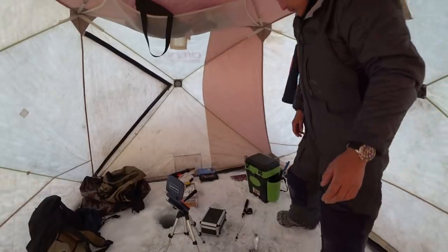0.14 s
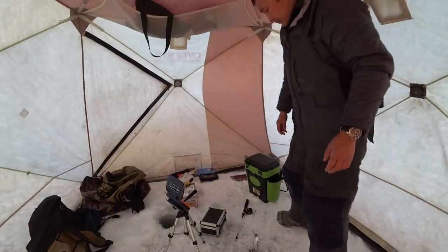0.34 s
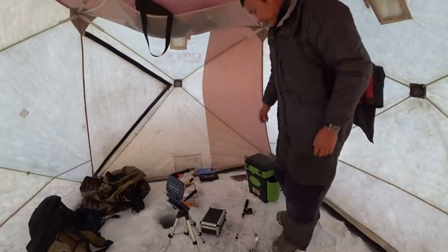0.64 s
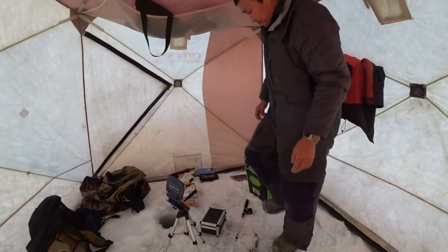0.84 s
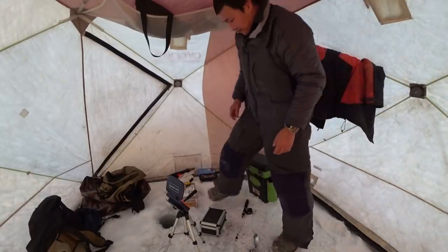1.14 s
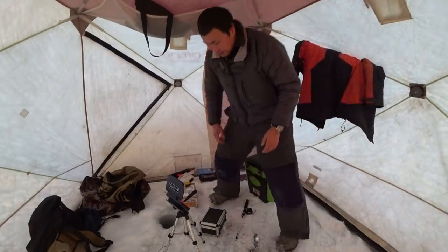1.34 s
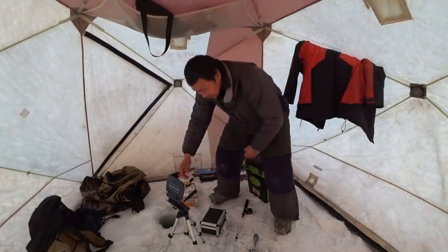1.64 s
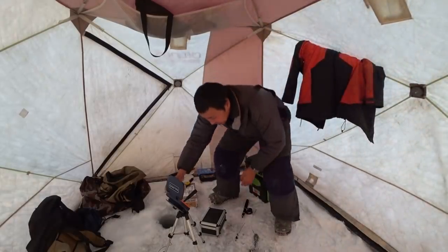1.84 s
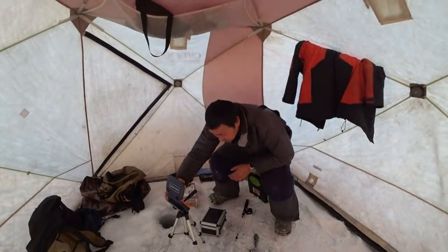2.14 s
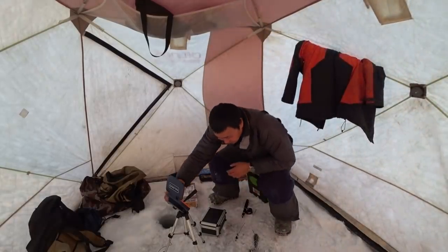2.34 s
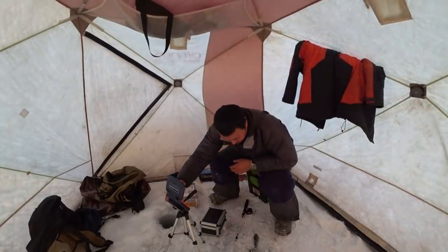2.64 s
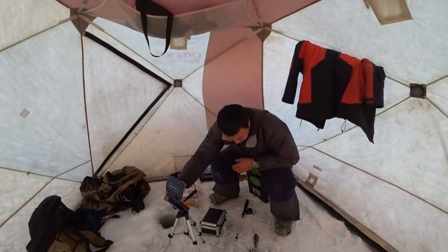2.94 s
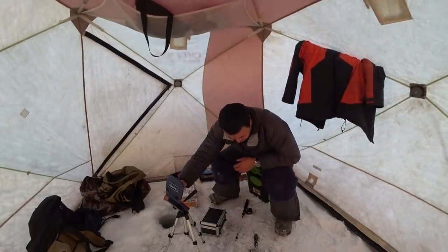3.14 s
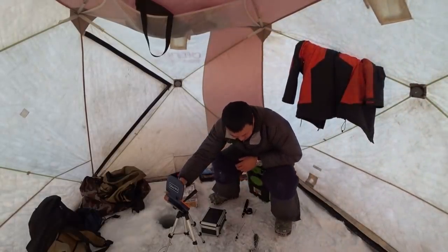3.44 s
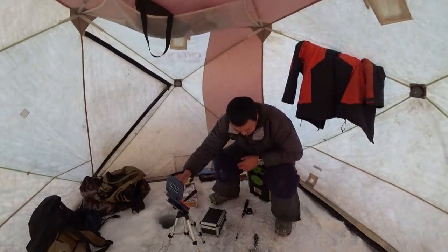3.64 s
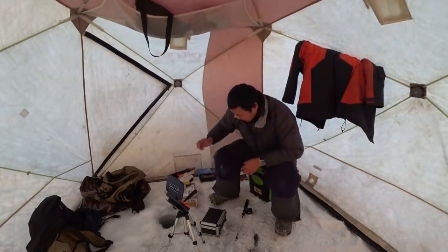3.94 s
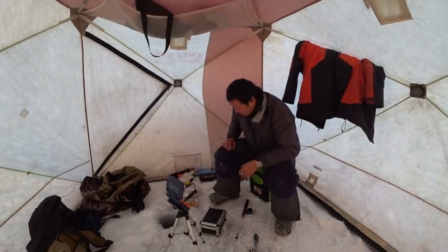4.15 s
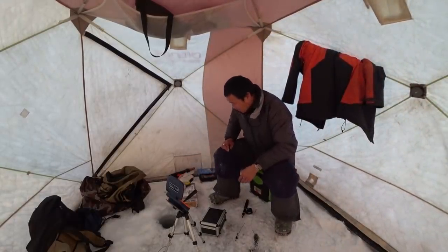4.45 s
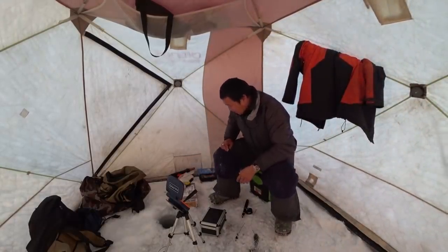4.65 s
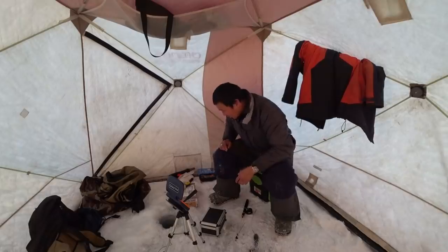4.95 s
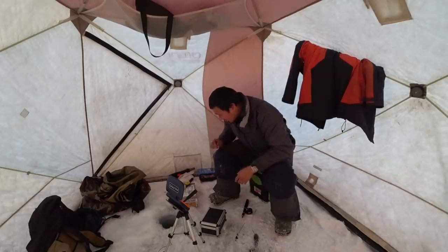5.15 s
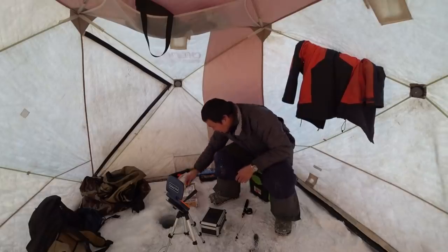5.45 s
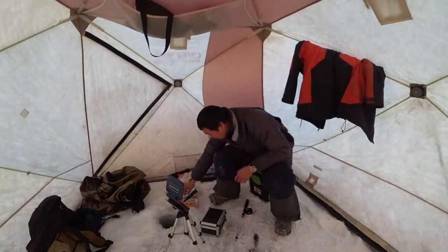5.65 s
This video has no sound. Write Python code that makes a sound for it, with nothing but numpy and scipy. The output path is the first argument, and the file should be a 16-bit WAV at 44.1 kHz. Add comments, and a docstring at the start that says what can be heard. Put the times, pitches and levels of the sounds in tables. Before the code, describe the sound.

For the first two seconds, a man takes a few soft steps over snowy ice inside a tent. Grains crunch, packed snow creaks and his padded jacket swishes lightly, with the firmest step and a crusty snap at about 1.3 seconds. From around 2.4 seconds, small fishing gear scrapes over the ice in short, gritty slips with a hollow ring, mixed with small creaks and bright snaps. The jacket rustles more strongly from 3.6 to 4.2 seconds, and a sleeve gives a brief hoarse whine as it slides over his knee, with a sharp crack near 4.2 seconds. From 4.4 seconds, a quick run of rasping scrapes builds to the loudest moment at about 5 seconds. Only a few light clicks and a faint rustle follow. Everything sounds fairly close and central, with a very short echo from the cloth walls over a faint, steady hiss.

```python
"""Small gear scrapes over ice in short, rasping slips with a hollow ring, handled by a man in a fishing tent.
He first steps across the snowy ice and sits: grains crunch under his boots, packed snow creaks, crust snaps.
His padded jacket swishes as threads catch and let go; a sleeve whines over his knee.
The tent walls give a very short echo over quiet air."""
import sys
import numpy as np
from scipy import signal
from scipy.fft import rfft, irfft
from scipy.io import wavfile
from scipy.ndimage import uniform_filter1d

SR = 44100
rng = np.random.default_rng(int(sys.argv[2]) if len(sys.argv) > 2 else 0)


def int16_out(signal):
    """Quantize to a 16-bit WAV file."""
    q = np.round(np.clip(np.atleast_2d(signal).T, -1, 1) * 32767)
    wavfile.write(sys.argv[1], SR, q.astype(np.int16))


N = 256220
TIME = np.arange(N) / SR

# spectra of crushed snow, rasping gear and glassy bare ice: freq_hz, relative_db
SNOW_SPECTRUM = [(60, -53), (170, -33), (250, -6.5), (340, -3.5), (430, -9), (600, 1), (900, 1), (1300, 0),
                 (2200, -7.5), (3300, -13.5), (7000, -14), (11000, -19.5)]
RASP_SPECTRUM = [(30, -83), (150, -19), (280, -14), (450, -7), (700, -3), (1150, -2), (1700, 1.5),
                 (2700, 0), (3500, -2), (5000, -3), (6800, -0.5), (9000, -5), (11000, -4.5)]
ICE_SPECTRUM = [(100, -28), (600, -9), (1300, 2), (1900, 2), (2700, 3), (3400, -8.5), (4100, 1),
                (4900, -12), (11000, -17)]


def gear_slips(rise_s=0.0011, hold_s=0.0048, fade_s=0.0087, grit_s=0.017, lag_s=0.00298, build_s=0.0048):
    """Each slip rasps abruptly and crushes grit; the hollow ring builds up and outlasts it."""
    # start_s, level_db
    slips = [(2.499, -27), (2.523, -26.5), (2.779, -20), (2.879, -22.5), (2.93, -21), (2.965, -20.5),
             (2.997, -19.5), (3.079, -27.5), (3.174, -26.5), (3.366, -21.5), (3.442, -23.5), (3.629, -24),
             (3.673, -19.5), (3.696, -20.5), (4.428, -24), (4.464, -17.5), (4.606, -17), (4.675, -16),
             (4.697, -28), (4.727, -18), (4.748, -22), (4.789, -35), (4.856, -15.5), (4.896, -13.5),
             (4.924, -11.5), (4.954, -9.5), (5.006, -9.5), (5.489, -32)]
    rasp_db, grit_db, ring_db = -8.5, -16, -2.5
    rasp, grit, ring = np.zeros((3, N))
    t = np.arange(6000) / SR
    slide = (1 - np.exp(-t / rise_s)) * np.exp(-np.maximum(t - hold_s, 0) / fade_s)
    build = 1 - np.exp(-(t / build_s) ** 2)
    for start_s, level_db in slips:
        body_db = 1.174 * level_db  # hard slips ring more
        add(rasp, start_s, amp(level_db + rasp_db) * slide * rng.standard_normal(len(t)))
        add(grit, start_s, amp(body_db + grit_db) * np.exp(-t / grit_s) * rng.standard_normal(len(t)))
        add(ring, start_s + lag_s, amp(body_db + ring_db) * build * gear_ring(detune=0.004))
    return colour(rasp, RASP_SPECTRUM) + colour(grit, SNOW_SPECTRUM) + ring


def gear_drags(ice_db=-5, rise_s=0.058, t60_s=0.066):
    """Grit chatters against the gear and keeps it ringing; bare ice adds a glassy scrape."""
    # start_s, length_s, level_db
    drags = [(2.382, 0.1, -36.5), (2.623, 0.39, -41), (3.012, 0.5, -50), (3.448, 0.088, -36.5),
             (3.617, 0.26, -34.5), (3.835, 0.36, -43), (4.181, .05, -31), (4.41, 0.15, -33.5)]
    grit = grains(rate_hz=4000, spread_db=2.5, clump_db=1.2, clump_hz=110)
    ring = unit(signal.oaconvolve(grit, gear_ring())[:N])
    crunch = unit(colour(grit, SNOW_SPECTRUM))
    scrape = amp(ice_db) * unit(colour(rng.standard_normal(N), ICE_SPECTRUM))
    push = power_sum(stroke(*drag, rise_s, change_db=0, t60_s=t60_s) for drag in drags)
    return push * unit(ring + crunch + scrape)


def gear_ring(detune=0):
    """Hollow ring after one push; so small a body radiates no bass."""
    # freq_hz, level_db, t60_s
    modes = [(351.3, -21, 0.11), (880, -7, 0.073), (941, 8.5, 0.041), (1436, 7, 0.036), (1676, -8, 0.056),
             (2060, -12, 0.054), (2310, -5.5, 0.042), (2470, -12, 0.092), (2684, 2.5, 0.028),
             (2863, -15, 0.04)]
    t = np.arange(6000) / SR
    ring = np.zeros(len(t))
    for freq_hz, level_db, t60_s in modes:
        detuned_hz = freq_hz * (1 + detune * rng.normal())
        ring += amp(level_db - 60 * t / t60_s) * np.cos(2 * np.pi * detuned_hz * t)
    return bandpass(ring, 170, 5000)


def snow_creaks(gain_db=-8, t60_s=0.0056, grit_db=-12, tail_db=-14, tail_t60_s=0.047):
    """Packed snow gives way in a few dull, gritty cycles; near walls return them and grains settle."""
    # start_s, level_db, pitch_hz, slip_s
    creaks = [(.184, -34.5, 736, 0.00059), (.513, -36, 860, 0.0018), (.586, -35.5, 990, 0.0046),
              (.746, -29, 1210, .003), (.977, -33.5, 955, 0.0039), (1.034, -37, 830, 0.0029),
              (1.093, -27, 885, 0.0019), (1.171, -38, 880, 0.0027), (1.277, -17, 1313, 0.0039),
              (1.296, -23, 984, 0.0064), (1.888, -32, 918, 0.0061), (1.909, -32, 807, 0.0081),
              (1.971, -30.5, 730, 0.00034), (2.126, -29, 815, 0.0044), (2.164, -25.5, 1020, 0.00072),
              (2.591, -41.5, 1030, 0.0065), (3.044, -32, 775, 0.0012), (3.114, -39, 795, .0015),
              (3.149, -25.5, 910, 0.00083), (3.202, -33, 780, 0.0013), (3.233, -25.5, 1260, 0.0039),
              (3.252, -30.5, 880, 0.0017), (3.3, -32, 786, .0014), (3.339, -24, 900, 0.0011),
              (3.404, -26.5, 870, 0.0021), (5.592, -25.5, 700, 0.00074)]
    # freq_hz, relative_db
    creak_spectrum = [(60, -29), (180, -33), (240, -2.5), (330, 5), (440, -4.5), (640, -5), (1300, -6.5),
                      (1900, -3), (3500, -9), (11000, -16)]
    echo_s, echo_gain = 0.004534, 0.74
    out, t = np.zeros(N), np.arange(3000) / SR
    for start_s, level_db, pitch_hz, slip_s in creaks + faint_creaks():
        unsteady, grit, settle = rng.standard_normal((3, len(t)))
        rate_hz = pitch_hz * (1 + 0.2 * unit(uniform_filter1d(unsteady, size=30)))
        pop = np.cos(2 * np.pi * np.cumsum(rate_hz) / SR) + amp(grit_db) * grit
        pop *= amp(level_db - 60 * np.maximum(t - slip_s, 0) / t60_s)
        tail = amp(level_db + tail_db - 60 * t / tail_t60_s) * settle
        add(out, start_s, pop + tail)
        for bounce in (1, 2):
            delay_s = echo_s * (bounce + rng.uniform(-0.307, 0.355))
            add(out, start_s + delay_s, echo_gain ** bounce * pop)
    return amp(gain_db) * colour(out, creak_spectrum)


def faint_creaks(gap_s=0.03, pitch_hz=824, slip_s=0.00092, spread_db=0.2):
    """Rows of small creaks that follow each other unevenly while the weight shifts."""
    # start_s, end_s, level_db
    weight_shifts = [(0.884, 1.24, -39), (1.512, 1.6, -32.5), (1.937, 2.27, -37)]
    rows = []
    for start_s, end_s, level_db in weight_shifts:
        at_s = start_s
        for longer, softer, higher in rng.standard_normal((16, 3)):
            if at_s < end_s:
                rows.append((at_s, level_db - spread_db * softer, pitch_hz * np.exp(0.27 * higher), slip_s))
            at_s += gap_s * np.exp(0.3 * longer)
    return rows


def boots(skid_db=-1):
    """Grains break under the sole, more weakly as the snow packs; on bare ice the sole skids."""
    # start_s, length_s, level_db, rise_s
    steps = [(0.223, .12, -36, 0.095), (0.629, 0.15, -39, 0.029), (1.267, 0.11, -27.5, 0.0025),
             (1.612, 0.021, -29, 0.017), (1.694, 0.058, -35.5, 0.047)]
    # start_s, length_s, level_db
    skids = [(0.634, 0.011, -33.5), (0.665, 0.094, -40.5), (0.792, 0.1, -43)]
    crunch = grains(rate_hz=3500, spread_db=3, clump_db=1.4, clump_hz=120)
    weight = power_sum(stroke(*step, change_db=-4.5, t60_s=0.21) for step in steps)
    slide = power_sum(stroke(*skid, rise_s=0.005, change_db=-3.5, t60_s=0.064) for skid in skids)
    snow = weight * patchy(colour(crunch, SNOW_SPECTRUM), depth_db=1.5)
    ice = amp(skid_db) * slide * unit(colour(crunch, ICE_SPECTRUM))
    return snow + ice


def jacket(gain_db=2):
    """Threads catch and let go thousands of times a second."""
    # faint rustle as the body shifts: time_s, level_db
    stir = [(.16, -76), (.21, -55), (1.15, -53.5), (2.0, -50), (3.2, -50), (4.35, -52), (5.08, -64),
            (5.3, -59), (5.81, -55)]
    # arms and legs: start_s, length_s, level_db, rise_s, change_db
    swishes = [(0.174, 0.1, -46, 0.067, -6.5), (0.608, .26, -46, .03, -9), (1.188, 0.24, -43.5, 0.094, -9),
               (1.475, 0.18, -44, 0.045, 3.5), (1.611, 0.3, -39, 0.012, -7.5), (2.372, 0.072, -34, 0.08, 2),
               (2.62, .38, -44.5, 0.057, 5.5), (3.356, 0.22, -43, 0.024, 5.5),
               (3.589, 0.12, -27, 0.041, -5.5), (3.768, 0.45, -30.5, 0.063, -0.5),
               (4.373, 0.15, -34.5, 0.024, -1), (5.106, .13, -52.5, 0.057, 0.5),
               (5.48, 0.29, -60.5, 0.042, 9)]
    # freq_hz, relative_db
    cloth_spectrum = [(60, -35.5), (170, -26), (290, -1), (430, -9.5), (700, 2.5), (1600, 4), (3300, -0.5),
                      (5000, -1), (7500, 2.5), (9200, -0.5), (11000, -2)]
    rub = grains(rate_hz=6000, spread_db=2, clump_db=1.5, clump_hz=46)
    motion = power_sum([level_curve(stir)] + [stroke(*swish, t60_s=0.18) for swish in swishes])
    return amp(gain_db) * motion * patchy(colour(rub, cloth_spectrum), depth_db=2)


def sleeve(gain_db=-1, jitter=0.0499, jitter_hz=448, flutter_hz=160, hiss_db=-7):
    """Ribs of the weave tick over the knee at an unsteady rate: a hoarse whine in a dull hiss."""
    # time_s, level_db, pitch_hz
    slide = [(4.098, -40.5, 964), (4.199, -32, 931), (4.261, -35.5, 911), (4.331, -37, 880),
             (4.4, -37, 874), (4.441, -48, 880)]
    # harmonics from the fundamental up: level_db
    harmonics = [0.5, 2.5, -5.5, -13]
    time_s, _, pitch_hz = np.transpose(slide)
    rate_hz = np.interp(TIME, time_s, pitch_hz) * (1 + jitter * wander(jitter_hz))
    phase = 2 * np.pi * np.cumsum(rate_hz) / SR
    whine = sum(amp(db) * wander(flutter_hz) * np.cos(k * phase) for k, db in enumerate(harmonics, 1))
    hiss = bandpass(rng.standard_normal(N), 550, 2800)
    return amp(gain_db) * level_curve(slide) * unit(unit(whine) + amp(hiss_db) * unit(hiss))


def snaps(gain_db=-5, t60_s=0.053):
    """Ice crust and small parts snap in brief, bright cracks."""
    # start_s, level_db
    cracks = [(.636, -32), (.8137, -35.5), (1.27, -19.5), (2.164, -31.5), (2.2827, -28), (2.416, -20.5),
              (2.5424, -25.5), (2.778, -18.5), (3.492, -19.5), (3.653, -19), (3.751, -20), (4.205, -15.5),
              (4.384, -19.5), (4.403, -27), (5.222, -24.5), (5.5912, -29)]
    out, t = np.zeros(N), np.arange(3000) / SR
    for start_s, level_db in cracks:
        add(out, start_s, amp(level_db + gain_db - 60 * t / t60_s) * rng.standard_normal(len(t)))
    return colour(out, RASP_SPECTRUM)


def thuds(pitch_hz=125, t60_s=0.073, rise_s=0.0037):
    """Weight pushes softly into the ice and is quickly damped."""
    # start_s, level_db
    pushes = [(1.272, -45), (1.621, -52), (2.782, -47)]
    out, t = np.zeros(N), np.arange(6000) / SR
    tone = (1 - np.exp(-t / rise_s)) * np.cos(2 * np.pi * pitch_hz * t)
    for start_s, level_db in pushes:
        add(out, start_s, amp(level_db - 60 * t / t60_s) * tone)
    return out


def tent_echo(x, t60_s=0.11, first_s=0.0014, density_hz=4000):
    """Dense reflections from the cloth walls, dying fast."""
    t = np.arange(8000) / SR
    taps = rng.choice([-1, 1], len(t)) * (rng.random(len(t)) < density_hz / SR)
    taps = taps * (t > first_s) * amp(-60 * t / t60_s)
    return signal.oaconvolve(x, taps / np.linalg.norm(taps))[:N]


def quiet_air(level_db=-55.5, crossfeed=0.062):
    """Steady faint hiss, nearly independent left and right."""
    # freq_hz, relative_db
    air_spectrum = [(30, -28), (70, -13), (200, -7.5), (400, 0), (700, 1.5), (1700, 3.5), (4600, -6.5),
                    (7400, -9), (11000, -12)]
    air = np.array([colour(rng.standard_normal(N), air_spectrum) for _ in range(2)])
    return amp(level_db) * unit(air + crossfeed * air[::-1])


def grains(rate_hz, spread_db, clump_db, clump_hz):
    """Tiny clicks of uneven size that come in clumps."""
    size = amp(spread_db * np.minimum(rng.exponential(1, N), 4)) * rng.choice([-1, 1], N)
    hits = rng.random(N) < rate_hz / SR
    return unit(size * hits * amp(clump_db * wander(clump_hz)))


def stroke(start_s, length_s, level_db, rise_s, change_db, t60_s):
    """Gain of one rub: it rises, holds with a slow change of level, and dies away."""
    t = TIME - start_s
    held_db = level_db + change_db * np.clip(t / length_s, 0, 1)
    decay_db = 60 * np.clip((t - length_s) / t60_s, 0, 2)
    return np.clip(t / rise_s, 0, 1) * amp(held_db - decay_db)


def patchy(x, depth_db, width_bins=7, span_frames=14):
    """Each fold or patch of snow has its own colour: bands swell and fade separately."""
    bands = signal.stft(x, nperseg=512, noverlap=384)[2]
    swell = uniform_filter1d(rng.standard_normal(bands.shape), width_bins, axis=0)
    swell = unit(uniform_filter1d(swell, span_frames, axis=1))
    return unit(signal.istft(bands * amp(depth_db * swell), nperseg=512, noverlap=384)[1][:N])


def wander(rate_hz):
    """Smooth noise of rms 1, rolling off above rate_hz."""
    freq_hz = np.fft.rfftfreq(N, 1 / SR)
    return unit(irfft(rfft(rng.standard_normal(N)) / (1 + (freq_hz / rate_hz) ** 4), N))


def colour(x, spectrum, size=4096):
    """Minimum-phase filter of unit energy with the given spectrum."""
    freq_hz, relative_db = np.transpose(spectrum)
    bin_hz = abs(np.fft.fftfreq(size, 1 / SR))
    log_gain = np.log(amp(np.interp(np.log(bin_hz + 1), np.log(freq_hz), relative_db)))
    response = np.exp(np.conj(signal.hilbert(log_gain)))
    taps = np.fft.ifft(response).real[:size // 2]
    return signal.oaconvolve(x, taps / np.linalg.norm(taps))[:N]


def bandpass(x, low_hz, high_hz, order=2):
    return signal.lfilter(*signal.butter(order, [low_hz, high_hz], "band", fs=SR), x)


def level_curve(rows):
    """Gain along a level curve, silent outside it."""
    time_s, level_db = np.transpose(rows)[:2]
    return amp(np.interp(TIME, time_s, level_db, left=-150, right=-150))


def power_sum(gains):
    """Unrelated rubs add in power."""
    return np.sqrt(sum(gain ** 2 for gain in gains))


def amp(db):
    return 10 ** (np.asarray(db) / 20)


def unit(x):
    """Scales to rms 1."""
    return x / np.sqrt(np.mean(x ** 2) + 1e-20)


def add(mix, start_s, sound):
    part = mix[max(round(start_s * SR), 0):][:len(sound)]
    part += sound[:len(part)]


def scene(mid_echo_db=-12, side_echo_db=-7, side_jacket_db=-12, right_db=1, right_lag_s=1.45e-5):
    """Sources near the centre; the echoes differ left and right above the bass, and the jacket is wide."""
    direct = jacket() + boots() + gear_drags() + sleeve()
    direct += gear_slips() + snow_creaks() + snaps() + thuds()
    mid = direct + amp(mid_echo_db) * tent_echo(direct)
    side = amp(side_echo_db) * bandpass(tent_echo(direct), 450, 4500, order=1)
    side += amp(side_jacket_db) * jacket()  # folds to either side rub on their own
    lag = np.exp(-2j * np.pi * np.fft.rfftfreq(N, 1 / SR) * right_lag_s)
    right = amp(right_db) * irfft(rfft(mid - side) * lag, N)
    return np.array([mid + side, right]) + quiet_air()


def record(dry, cutoff_hz=11080):
    """Steep low-pass band limit."""
    taps = signal.firwin(501, cutoff_hz, window=("kaiser", 8), fs=SR)
    return signal.oaconvolve(dry, taps[None], "same")


dry = scene()
out = record(dry)
int16_out(out)
```